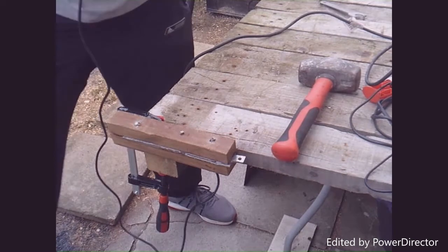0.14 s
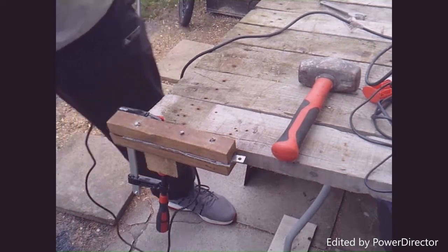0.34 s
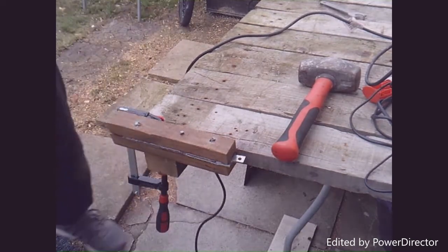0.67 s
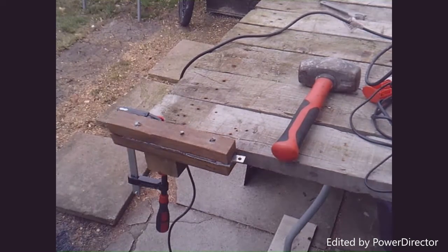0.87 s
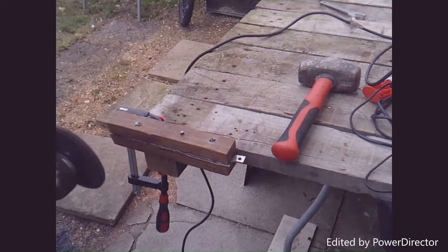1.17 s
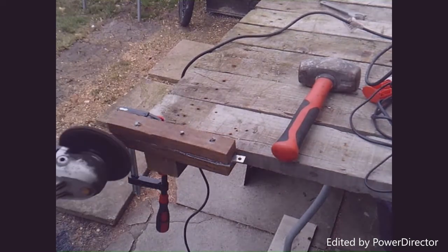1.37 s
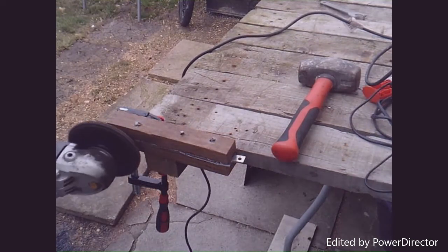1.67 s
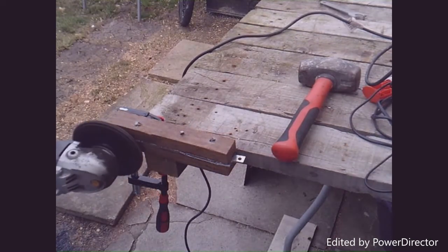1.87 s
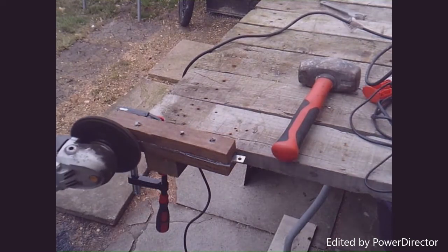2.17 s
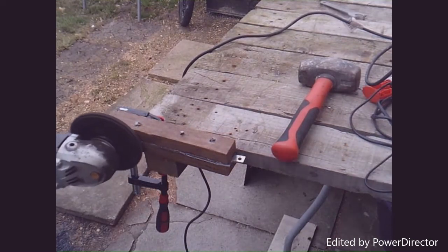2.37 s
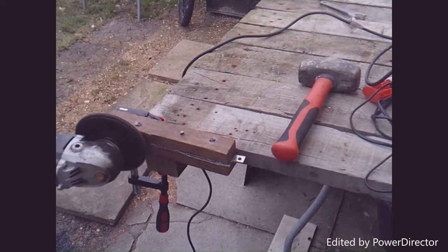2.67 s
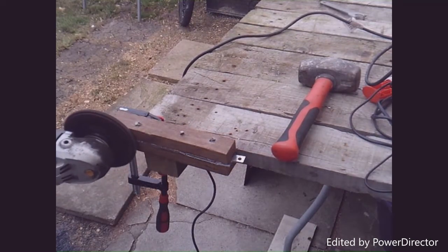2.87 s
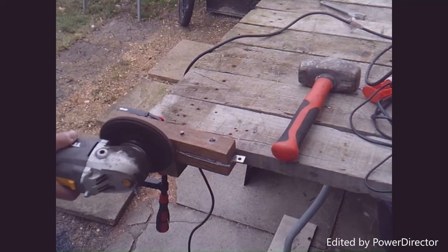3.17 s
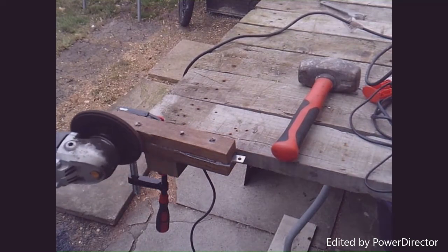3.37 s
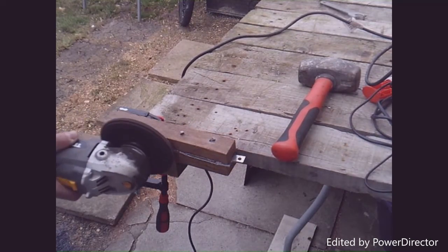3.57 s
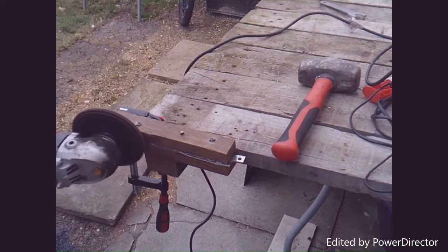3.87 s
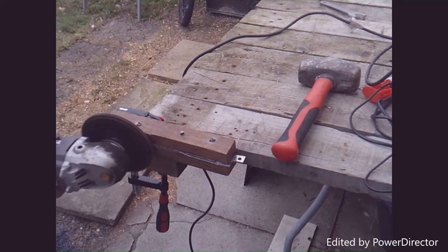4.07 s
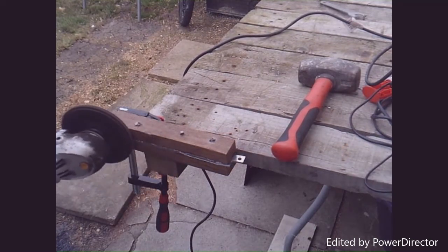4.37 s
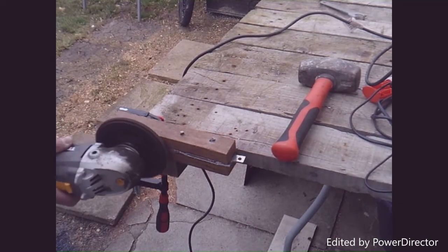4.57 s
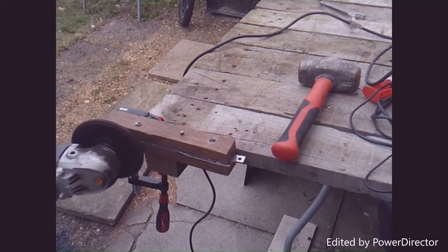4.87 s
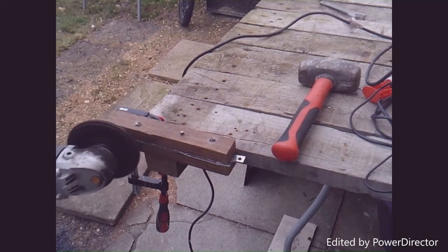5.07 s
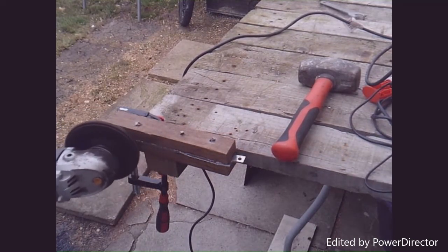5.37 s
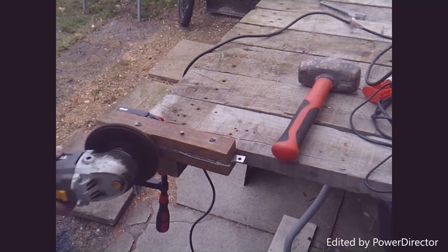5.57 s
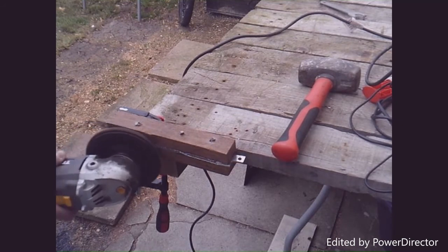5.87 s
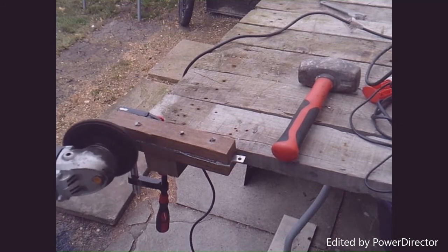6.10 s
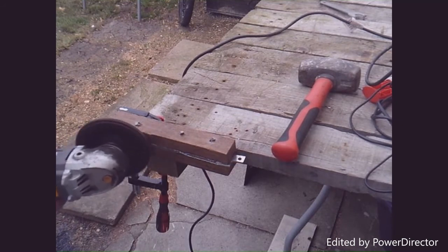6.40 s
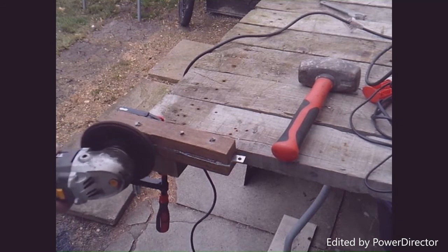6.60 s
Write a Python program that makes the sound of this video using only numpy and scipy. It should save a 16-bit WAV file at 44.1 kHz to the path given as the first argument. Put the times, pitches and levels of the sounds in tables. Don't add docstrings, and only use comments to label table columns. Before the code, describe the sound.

For the first 0.2 seconds there is only faint outdoor air and light wind, with two tiny plastic clicks near 0.12 and a sharper snap at 0.23. At 0.24 an angle grinder bursts on almost instantly: a dense broadband roar, gear rattle and a whine sweeping rapidly upward, settling into fast free running by about 1 second. The sound is close, flattened and crackly from overload, with no treble above roughly 5.5 kHz. Loudness drops slightly at 1.2. Around 2.1 to 2.6 the disc bites steel, level drops again, crackle largely clears and pitch sags. Steady gritty hiss, rasp and shimmering metallic whine continue, wavering with hand pressure, with small snags near 3.0 and chirps around 4.2 and 4.6. At 4.36 the level steps down clearly; grinding continues, slightly lower in pitch near 6.4, until cut off at 6.7.

```python
import sys
import numpy as np
from scipy import signal
from scipy.fft import rfft, irfft
from scipy.io import wavfile
from scipy.ndimage import uniform_filter1d, map_coordinates

SR = 44100
rng = np.random.default_rng(int(sys.argv[2]) if len(sys.argv) > 2 else 0)


def dump(signal):
    limited = np.clip(np.atleast_2d(signal).T, -1, 1)
    pcm = np.round(limited * 32767).astype(np.int16)
    wavfile.write(sys.argv[1], SR, pcm)


def linear_from_db(decibels):
    return 10 ** (np.asarray(decibels, float) / 20)


N = 297234

GEAR_TEETH = 37
LOADED_HZ = 145.5
START_S, RISE_S = 0.2355, 0.0049


def level(x, db):
    return x * linear_from_db(db) / np.sqrt(np.mean(x ** 2))


def walk(rate):
    steps = np.arange(N) * min(rate, 70) / SR
    return 1.1 * map_coordinates(rng.standard_normal(512), [steps], order=2)


def colour(x, shape):
    hz, db = np.transpose(shape)
    log_f = np.log(np.arange(N // 2 + 1) * SR / N + 1)
    gain = linear_from_db(np.interp(log_f, np.log(hz), db, left=-70, right=-70))
    return level(irfft(rfft(x) * gain, N), 0)


def curve(rows):
    s, value = np.transpose(rows)
    return np.interp(np.arange(N) / SR, s, value)


# frequency in Hz, density in dB per Hz.
YARD_SPECTRUM = [(53, -27.5), (90, -9), (125, -22.5), (256, -30.5), (348, -19), (421, -21.5), (1930, -30.5),
                 (2290, -28), (4710, -33), (5400, -49.5), (7020, -71), (11900, -120)]


def yard_air():
    return linear_from_db(-69 + 4.8 * walk(20)) * colour(rng.standard_normal(N), YARD_SPECTRUM)


# frequency in Hz, density in dB per Hz.
WIND_SPECTRUM = [(12, -8), (25, -1.5), (60, -9.5), (120, -7.5), (250, -27)]
# centre in seconds, level in dB, length in seconds.
GUSTS = [(0.26, -86, 0.052), (0.81, -72.5, .06), (1.088, -51.5, 0.12), (1.705, -68, 0.18),
         (2.187, -56, 0.45), (2.607, -53, 0.075), (3.12, -55.5, 0.064), (3.485, -60.5, 0.19),
         (3.997, -58.5, 0.031), (4.6, -54, 0.032), (5.064, -64, 0.089)]


def wind():
    t = np.arange(N) / SR
    strength = linear_from_db(-67.5)
    for s, db, length in GUSTS:
        strength = strength + linear_from_db(db) * np.exp(-((t - s) / length) ** 2)
    return strength * linear_from_db(0.8 * walk(14)) * colour(rng.standard_normal(N), WIND_SPECTRUM)


# start in seconds, level in dB, resonance in Hz, decay time T60 in seconds.
SWITCH_CLICKS = [
    (0.116, -49, 2250, 0.014),
    (.13, -51, 2500, 0.032),
    (.229, -40, 2600, 0.053),
]


def switch():
    out, t = np.zeros(N), np.arange(2000) / SR
    for s, db, hz, t60 in SWITCH_CLICKS:
        resonance = signal.butter(1, [0.75 * hz, hz], "bandpass", fs=SR, output="sos")
        burst = signal.sosfilt(resonance, rng.standard_normal(len(t)))
        start = int(s * SR)
        out[start:start + len(t)] += 3 * linear_from_db(db) * burst * np.exp(-np.log(1000) * t / t60)
    return out


# frequency in Hz, density in dB per Hz.
RUMBLE_SPECTRUM = [(70, -39.5), (110, -10.5), (200, -6), (400, -1.5), (700, -2), (900, -20)]


def rumble():
    return linear_from_db(-25.5 + 1.8 * walk(18)) * colour(rng.standard_normal(N), RUMBLE_SPECTRUM)


# frequency in Hz, density in dB per Hz.
DRONE_SPECTRUM = [(700, -23), (950, -8), (1250, -0.5), (1700, -15), (2100, -12.5)]


def drone(hz, load):
    resonance_db = 7.5 * np.exp(-((hz - 140) / 12) ** 2) * (1 - load)
    drone_db = -15.5 + resonance_db + 1.1 * walk(18)
    return linear_from_db(drone_db) * colour(rng.standard_normal(N), DRONE_SPECTRUM)


# frequency in Hz, density in dB per Hz.
HISS_SPECTRUM = [(3700, -24), (4200, -6), (4700, -2), (5100, 0), (6000, -1), (7000, -20)]


def grit_hiss(beat, hz, load):
    octaves_short = np.minimum(np.log2(hz / LOADED_HZ), 0)
    hiss_db = -13 + 5.5 * load + 7.5 * octaves_short + 0.15 * walk(8.8)
    return linear_from_db(hiss_db) * colour(rng.standard_normal(N) * (1 + 0.47 * beat), HISS_SPECTRUM)


# frequency in Hz, density in dB per Hz.
ROAR_SPECTRUM = [(290, -36), (500, -20.5), (687, -10), (757, -13.5), (841, -6.5), (1020, -12.5), (1210, -5),
                 (2040, -1.5), (2310, -4), (2800, 2), (3970, -0.5), (5000, -5.5), (6500, -36),
                 (11000, -120)]


def fan_roar(beat):
    noise = rng.standard_normal(N) * (1 + 0.074 * beat)
    return linear_from_db(-3 + 0.5 * walk(9)) * colour(noise, ROAR_SPECTRUM)


# frequency in Hz, width in Hz, then gain in dB when
GUARD_BANDS = [(1312, 86, -1, 0, -2.5), (2050, 440, 1.5, 0, -1), (2340, 88, 3.5, 2, -3.5),
               (2550, 84, 0.5, 1, 2.5), (3060, 73, 0.5, -0.5, -1), (3230, 160, 0, 1, -2.5),
               (3520, 160, 2.5, 0, 1.5), (3870, 280, 2, -1.5, -4), (4070, 320, -5, 0, -1),
               (4490, 150, -2, 4.5, 1.5), (4720, 150, -3, 3.5, 2), (5330, 130, -0.5, -2, -3)]


def guard(air, load):
    f, spectrum = np.arange(N // 2 + 1) * SR / N, rfft(air)
    colourings = []
    for place in range(3):
        gain_db = sum(db[place] * np.exp(-((f - hz) / width) ** 2) for hz, width, *db in GUARD_BANDS)
        colourings.append(irfft(spectrum * linear_from_db(gain_db), N))
    away, near, cutting = colourings
    come = 1 / (1 + np.exp((0.94 - np.arange(N) / SR) / 0.14))
    return (1 - come) * away + come * ((1 - load) * near + load * cutting)


def rattle(turns):
    t = np.maximum(np.arange(N) / SR - START_S, 0)
    lowpass = signal.butter(2, 300, fs=SR, output="sos")
    rough = signal.sosfilt(lowpass, rng.standard_normal((2, N)))
    mesh = 2 * np.pi * GEAR_TEETH * turns
    chatter = level(rough[0] * np.sin(mesh) + rough[1] * np.cos(mesh), 0)
    envelope = (1 - np.exp(-(t / 0.075) ** 2)) * np.exp(-t / 0.11)
    return linear_from_db(2.5) * envelope * chatter


# mesh rate in Hz, whine level in dB.
GEARBOX = [(2000, -40), (2350, -15), (2800, -24), (3400, -18), (3850, -15), (4100, -29), (4650, -34),
           (4950, -21), (5250, -22), (5550, -20)]


def whine_level(hz, load):
    return np.interp(GEAR_TEETH * hz, *np.transpose(GEARBOX)) + 9 * (1 - load) ** 10


def tone(turns, wander_db, slip):
    phase = turns + rng.random() + slip * walk(10)
    return level(linear_from_db(wander_db * walk(13)) * np.sin(2 * np.pi * phase), 0)


LOW_SWELLS = [(1.5, 0.4, 1, -38), (2.65, 0.4, 1, -29), (3.42, 0.4, 1, -34), (3.98, 0.4, 1, -33),
              (4.6, 0.12, 1, -30), (4.82, 0.4, 1, -31), (4.99, 0.08, 1, -35), (5.17, 0.08, 1, -34),
              (5.51, 0.08, 1, -33), (5.9, 0.4, 1, -34), (6.21, 0.08, 1, -38), (6.58, 0.4, 1, -34),
              (6.64, 0.12, 1, -34), (1.06, 0.4, 2, -33), (1.61, 0.4, 2, -35), (2.09, 0.4, 2, -31),
              (2.87, 0.4, 2, -29), (3.35, 0.27, 2, -31), (3.99, 0.4, 2, -32), (4.2, 0.08, 2, -28),
              (4.59, 0.4, 2, -29), (4.6, 0.08, 2, -28), (5.51, 0.12, 2, -34), (5.59, 0.4, 2, -29),
              (5.97, 0.08, 2, -33), (6.18, 0.4, 2, -32), (6.23, 0.08, 2, -34), (6.62, 0.08, 2, -29),
              (2.42, 0.27, 3.083, -32), (2.9, 0.12, 3.083, -27), (3.27, 0.4, 3.083, -27),
              (3.91, 0.4, 3.083, -28), (4.65, 0.12, 3.083, -27), (4.91, 0.4, 3.083, -26),
              (5.21, 0.08, 3.083, -27), (5.66, 0.4, 3.083, -27), (6.18, 0.4, 3.083, -26),
              (6.59, 0.27, 3.083, -28), (2.5, 0.4, 4, -30), (3.52, 0.4, 4, -25), (4.65, 0.12, 4, -25),
              (6.3, 0.4, 4, -35),
              (2.48, 0.6, 5, -30), (4.82, 0.6, 5, -31), (5.97, 0.6, 5, -28), (3.07, 0.6, 6, -25),
           (5.14, 0.6, 6, -27), (6.11, 0.6, 6, -30), (3.57, 0.12, 6.167, -22), (3.59, 0.6, 6.167, -24),
           (5.37, 0.6, 6.167, -25), (6.46, 0.6, 6.167, -28), (2.44, 0.6, 7, -25), (3.5, 0.6, 7, -24),
           (4.44, 0.6, 7, -26), (5.53, 0.6, 7, -21), (2.68, 0.6, 8, -21), (3.45, 0.4, 8, -23),
           (4.09, 0.6, 8, -19), (6.2, 0.6, 8, -24), (1.3, 0.6, 9.25, -22), (2.84, 0.6, 9.25, -18),
           (3.98, 0.6, 9.25, -21), (4.82, 0.4, 9.25, -21), (6.27, 0.6, 9.25, -17), (6.36, 0.12, 9.25, -18),
              (3.29, 0.18, 10, -20), (5.54, 0.6, 11, -22), (4.07, 0.6, 12, -23), (5.44, 0.27, 12, -20),
           (1.42, 0.6, 12.33, -19), (2.85, 0.6, 12.33, -19), (6.29, 0.6, 13, -21), (1.97, 0.6, 14, -18),
           (3.25, 0.6, 14, -22), (2.38, 0.6, 15, -23), (4.64, 0.6, 16, -19), (5.46, 0.6, 16, -19),
           (6.44, 0.6, 16, -22), (0.98, 0.4, 18.5, -18), (1.78, 0.6, 18.5, -16), (5.93, 0.6, 18.5, -19),
           (2.41, 0.6, 21, -20), (2.93, 0.6, 22, -15), (3.73, 0.4, 22, -17), (5.54, 0.6, 22, -17),
           (2.68, 0.6, 23, -19), (3.86, 0.6, 23, -19), (2.61, 0.6, 24, -15), (3.41, 0.27, 24, -16),
           (4.24, 0.6, 24, -20), (5.73, 0.6, 24, -22), (2.38, 0.27, 25, -18), (3.16, 0.6, 25, -18),
           (4.04, 0.6, 25, -15), (6.0, 0.6, 25, -20), (2.44, 0.18, 26, -20), (3.08, 0.6, 26, -19),
           (3.62, 0.12, 26, -18), (4.56, 0.12, 26, -17), (5.68, 0.6, 26, -16), (2.28, 0.27, 27, -16),
           (3.0, 0.6, 27, -19), (4.34, 0.6, 27, -20), (4.93, 0.18, 27, -18), (6.1, 0.6, 27, -20)]
HIGH_SWELLS = [(1.97, 0.25, 28, -11), (5.66, 0.12, 28, -20), (6.46, 0.25, 28, -21), (1.87, 0.25, 29, -17),
               (2.83, 0.25, 29, -17), (3.31, 0.25, 29, -17), (3.63, 0.12, 29, -16), (4.12, 0.25, 29, -17),
               (4.52, 0.25, 29, -13), (4.52, 0.05, 29, -14), (4.89, 0.18, 29, -23), (5.28, 0.25, 29, -17),
               (6.02, 0.05, 29, -15), (6.09, 0.25, 29, -14), (6.3, 0.05, 29, -16), (6.62, 0.25, 29, -18),
               (6.71, 0.05, 29, -19), (2.03, 0.25, 30, -17), (2.44, 0.25, 30, -13), (2.81, 0.25, 30, -8),
               (3.13, 0.25, 30, -15), (3.49, 0.25, 30, -11), (3.53, 0.05, 30, -12), (4.06, 0.25, 30, -16),
               (4.51, 0.25, 30, -12), (4.88, 0.18, 30, -19), (6.21, 0.25, 30, -21), (2.48, 0.25, 31, -16),
               (2.99, 0.18, 31, -9), (3.03, 0.08, 31, -14), (3.28, 0.25, 31, -9), (3.31, 0.08, 31, -14),
               (3.56, 0.08, 31, -9), (3.92, 0.25, 31, -13), (4.34, 0.25, 31, -14), (6.25, 0.25, 31, -21),
               (2.05, 0.25, 32, -24), (2.57, 0.25, 32, -18), (2.87, 0.08, 32, -9), (3.07, 0.25, 32, -7),
               (3.29, 0.12, 32, -13), (3.54, 0.25, 32, -10), (3.61, 0.05, 32, -9), (3.96, 0.12, 32, -16),
               (4.68, 0.25, 32, -11), (4.73, 0.05, 32, -12), (5.01, 0.08, 32, -13), (5.2, 0.25, 32, -14),
               (5.56, 0.25, 32, -18), (6.02, 0.25, 32, -18),
               (2.18, 0.08, 33, -14), (2.43, 0.12, 33, -15), (3.2, 0.25, 33, -11), (3.61, 0.12, 33, -14),
           (3.87, 0.25, 33, -13), (4.69, 0.25, 33, -12), (5.08, 0.25, 33, -17), (5.59, 0.18, 33, -12),
           (5.99, 0.25, 33, -11), (6.49, 0.25, 33, -14), (2.57, 0.05, 34, -12), (2.76, 0.25, 34, -15),
           (3.24, 0.25, 34, -8), (3.64, 0.05, 34, -11), (3.67, 0.25, 34, -11), (5.17, 0.25, 34, -14),
           (5.79, 0.25, 34, -14), (6.39, 0.25, 34, -15), (2.77, 0.25, 35, -11), (3.05, 0.08, 35, -13),
           (3.25, 0.25, 35, -9), (3.53, 0.08, 35, -12), (3.7, 0.25, 35, -12), (3.89, 0.05, 35, -12),
           (4.21, 0.25, 35, -13), (4.24, 0.05, 35, -11), (4.63, 0.12, 35, -8), (5.08, 0.12, 35, -11),
           (5.44, 0.25, 35, -14), (5.44, 0.05, 35, -12), (6.11, 0.25, 35, -12), (6.58, 0.25, 35, -13),
           (3.03, 0.25, 36, -17), (3.72, 0.25, 36, -16), (4.25, 0.25, 36, -17), (4.73, 0.25, 36, -11),
           (2.92, 0.12, 37, -15), (3.32, 0.25, 37, -12), (3.67, 0.05, 37, -13), (3.79, 0.25, 37, -15),
           (4.03, 0.08, 37, -13), (4.28, 0.25, 37, -15), (4.3, 0.08, 37, -17), (4.82, 0.25, 37, -12),
           (5.28, 0.25, 37, -10), (5.66, 0.25, 37, -11), (5.99, 0.25, 37, -13), (6.27, 0.12, 37, -15),
           (6.46, 0.25, 37, -9), (6.64, 0.08, 37, -13)]
EXTRA_SWELLS = [
    (4.63, .05, 35, -6),
    (4.23, .04, 35, -8),
    (3.3, .1, 35, -10),
    (5.09, .04, 34, -9),
    (6.48, .06, 35, -9),
    (4.62, .06, 2, -24),
]


def shaft_tones(turns, whine_db):
    t = np.arange(0, N + 128, 128) / SR
    low = [(s, length, k, db - 0.1) for s, length, k, db in LOW_SWELLS]
    high = [(s, length, k, db - 0.8) for s, length, k, db in HIGH_SWELLS + EXTRA_SWELLS]
    swells, out = low + high, 0
    for k in sorted({row[2] for row in swells}):
        power = sum((linear_from_db(db) * np.exp(-((t - s) / length) ** 2)) ** 2
                    for s, length, multiple, db in swells if multiple == k)
        power = np.interp(np.arange(N) / SR, t, power)
        if k == GEAR_TEETH:
            power = power + linear_from_db(whine_db) ** 2
        out = out + np.sqrt(power) * tone(k * turns, wander_db=2.8 + 3 / k, slip=0.05)
    return out


# time in seconds, extra drag in Hz.
LEAN = [(2.4, -0.5), (2.46, -2.1), (2.51, -2.5), (2.7, -0.0), (2.93, 0.1), (3.01, -0.9), (3.08, -0.8),
        (3.24, 2.0), (3.41, 1.9), (3.6, 0.6), (3.81, 3.9), (4.0, 1.8), (4.12, -0.3), (4.16, 0.5),
        (4.24, 3.9), (4.3, 5.6), (4.33, 5.2), (4.47, 0.3), (4.5, -0.2), (4.55, 1.3), (4.67, 7.5),
        (4.73, 9.0), (4.77, 8.5), (4.92, 5.3), (4.95, 5.3), (5.03, 7.0), (5.08, 7.5), (5.24, 3.7),
        (5.56, 2.9), (5.7, 5.5), (5.88, 4.6), (5.91, 5.3), (5.99, 8.8), (6.04, 9.8), (6.25, 10.4),
        (6.37, 12.1), (6.42, 11.5), (6.53, 8.1), (6.63, 6.1), (6.74, 6.1)]


def speed():
    start_hz, free_hz = 40, 172
    creep_hz, creep_s, spin_up_s = 50, 0.45, 0.175
    t = np.arange(N) / SR
    load = 1 / (1 + np.exp((2.36 - t) / 0.19))
    on = np.maximum(t - START_S, 0)
    quick = (free_hz - start_hz - creep_hz) * np.exp(-on / spin_up_s)
    free = free_hz - quick - creep_hz * np.exp(-on / creep_s)
    drag = uniform_filter1d(curve(LEAN), size=1500)
    return free - load * (free_hz - LOADED_HZ + drag), load


# time in seconds, roar level in dB.
NEARNESS = [(.25, -28.5), (.4, -25.5), (.55, -27.5), (.88, -23), (1.15, -24), (1.3, -25.5), (2.1, -25.5),
            (2.7, -28), (3.3, -27.5), (4.0, -27), (4.3, -26), (4.62, -26), (4.85, -26.5), (6.74, -27)]


def grinder():
    hz, load = speed()
    turns = np.cumsum(hz) / SR
    beat = np.cos(2 * np.pi * (turns + 0.21 * walk(30)))
    air = fan_roar(beat) + grit_hiss(beat, hz, load) + drone(hz, load) + rumble()
    tones = shaft_tones(turns, whine_level(hz, load))
    power = np.clip((np.arange(N) / SR - START_S) / RISE_S, 0, 1)
    return power * linear_from_db(curve(NEARNESS)) * (guard(air, load) + tones + rattle(turns))


def scene():
    return (yard_air() + wind() + switch() + grinder())[None]


# time in seconds, change in dB.
GAIN_STEPS = [
    (1.206, -2),
    (2.136, -3.5),
    (4.363, -5),
]


def turn_down(x):
    t = np.arange(N) / SR
    return x * linear_from_db(uniform_filter1d(sum(db * (t > s) for s, db in GAIN_STEPS), size=400))


def squeeze(x, step_db, scatter_db):
    frame = 2048
    z = signal.stft(x, nperseg=frame)[2]
    local = uniform_filter1d(abs(z) ** 2, size=24, axis=0) + 1e-18
    loud = np.mean(local[:frame // 8], axis=0)
    scatter = linear_from_db(step_db + scatter_db * rng.standard_normal(len(loud)))
    step = local ** 0.42 * loud ** 0.08 * scatter
    return signal.istft(np.round(z / step) * step, nperseg=frame)[1][:N]


# centre in seconds, length in seconds, top in Hz.
DROPOUTS = [(1.43, 0.024, 500), (1.463, 0.022, 810), (1.798, 0.019, 400), (1.941, 0.019, 804),
            (2.462, 0.078, 490), (2.943, 0.0057, 695), (3.062, 0.014, 590), (2.915, 0.015, 900),
            (3.35, 0.02, 330), (3.54, 0.01, 506), (3.683, .018, 350), (3.762, 0.016, 328),
            (3.931, 0.0092, 900), (3.828, 0.028, 577), (4.822, 0.02, 490), (5.096, 0.016, 497),
            (5.238, 0.01, 497), (5.282, 0.012, 600), (5.668, 0.017, 390)]


def lose_bass(x):
    t, lost = np.arange(N) / SR, 0
    for s, length, hz in DROPOUTS:
        bass = signal.sosfiltfilt(signal.butter(4, hz, fs=SR, output="sos"), x)
        lost = lost + np.exp(-((t - s) / (0.6 * length)) ** 4) * bass
    return x - 0.97 * lost


# centre in seconds, length in seconds.
SLACK = [
    (0.243, 0.0071),
    (1.422, 0.013),
    (1.47, 0.0083),
    (1.616, .007),
    (1.699, 0.026),
    (1.747, .012),
]


def headroom(t):
    releases = sum(np.exp(-((t - s) / length) ** 4) for s, length in SLACK)
    return linear_from_db(4.5 * ((t > 2.15) + releases))


def overload(x, ceiling):
    knee = 10
    return x / (1 + abs(x / ceiling) ** knee) ** (1 / knee)


# frequency in Hz, gain in dB.
BAND_EDGE = [(5150, 0.5), (5300, -1), (5500, -16), (5660, -29), (5760, -63)]


def narrow_band(x):
    hz, db = np.transpose(BAND_EDGE)
    return irfft(rfft(x) * linear_from_db(np.interp(np.arange(N // 2 + 1) * SR / N, hz, db)), N)


# start in seconds, peak in dB.
SNAGS = [
    (2.188, -63),
    (2.809, -56.5),
    (3.0002, -47.5),
    (3.0604, -57),
    (3.0877, -61),
    (3.6888, -63.5),
    (3.952, -66),
    (6.729, -65),
]
# start in seconds, peak in dB before a 10 dB cut.
CRACKLE = [(0.2598, -46.5), (0.2678, -42.5), (0.2902, -30), (0.3072, -39.5), (0.3486, -31), (0.381, -37.5),
           (0.4, -40.5), (0.4763, -51), (0.4893, -41.5), (0.5342, -43.5), (0.5741, -35), (0.598, -43),
           (0.6315, -39), (0.6544, -39), (0.7038, -43), (0.7208, -41), (0.7442, -41.5), (0.7687, -34.5),
           (0.8145, -37), (0.8355, -38.5), (0.8669, -34), (0.8994, -32.5), (1.0196, -34.5), (1.061, -43),
           (1.072, -32.5), (1.1223, -32.5), (1.1463, -41.5), (1.1777, -33), (1.2216, -47.5),
           (1.2386, -39.5), (1.2755, -42), (1.293, -33), (1.3249, -33.5), (1.379, -31.5), (1.4396, -46),
           (1.4815, -48), (1.504, -40.5), (1.5254, -27), (1.5609, -38.5), (1.5848, -41), (1.6257, -53),
           (1.6496, -46), (1.6636, -43.5), (1.721, -46.5), (1.7689, -43.5), (1.7868, -39.5),
           (1.8253, -49.5), (1.8332, -43), (1.8572, -36), (1.8826, -41.5), (1.9041, -47), (1.943, -40),
           (1.9814, -37), (2.0028, -39), (2.0462, -37.5), (2.0887, -34.5), (2.1146, -48.5)]


def snags():
    out, t = np.zeros(N), np.arange(400) / SR
    for s, db in SNAGS + [(s, db - 10) for s, db in CRACKLE]:
        start = int(s * SR)
        out[start:start + len(t)] += linear_from_db(db) * rng.standard_normal(len(t)) * np.exp(-t / 0.0014)
    return out


def fizz(t, lift):
    return linear_from_db(-78 + 3 * walk(25)) * rng.standard_normal(N) * (t > 0.27) / lift ** 4


def band_limit(x):
    return signal.sosfilt(signal.butter(12, 15740, fs=SR, output="sos"), x)


def record(dry):
    t = np.arange(N) / SR
    turned = turn_down(dry[0])
    stored = lose_bass(squeeze(turned, step_db=-0.5, scatter_db=2.0))
    stored = np.where(t < START_S + RISE_S, turned, stored)
    lift = headroom(t)
    band = narrow_band(overload(stored, 0.1 * lift))
    clipped = overload(band, 0.1 * lift) + snags() + fizz(t, lift)
    hush = linear_from_db(-93) * rng.standard_normal(N)
    mix = clipped + 0.0013 + hush
    return band_limit(mix[None])


dry = scene()
out = record(dry)
dump(out)
```